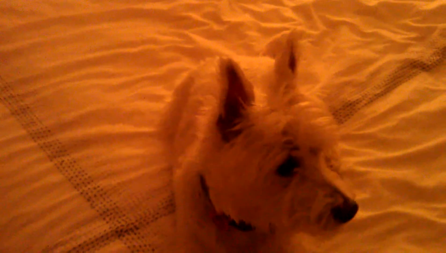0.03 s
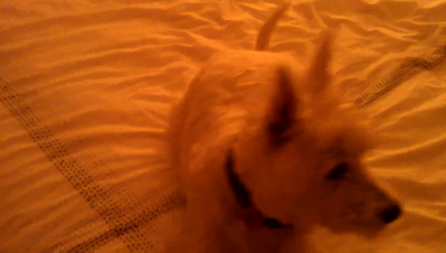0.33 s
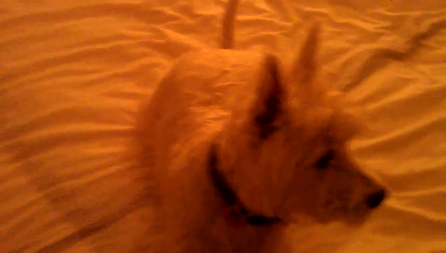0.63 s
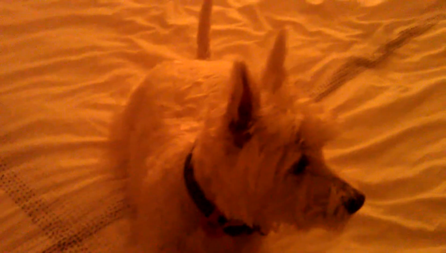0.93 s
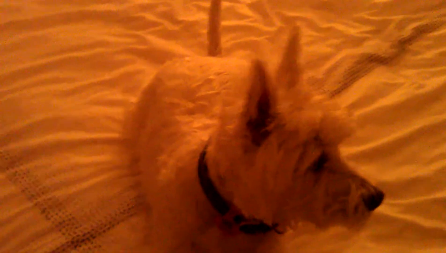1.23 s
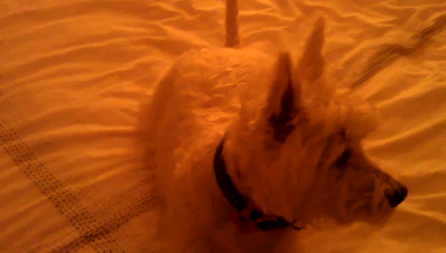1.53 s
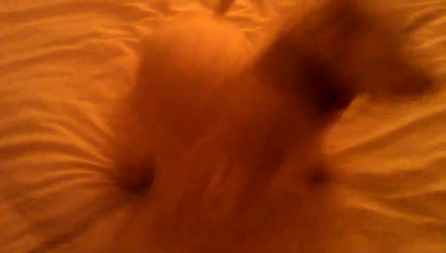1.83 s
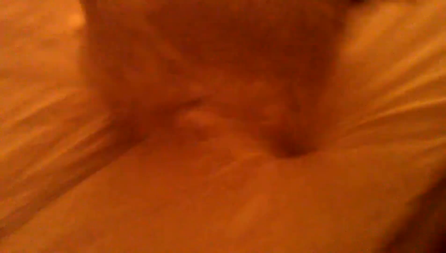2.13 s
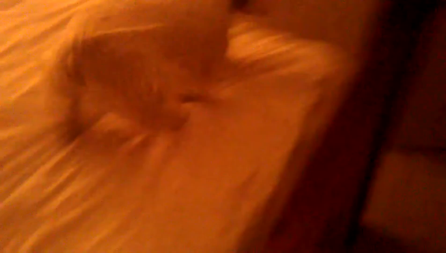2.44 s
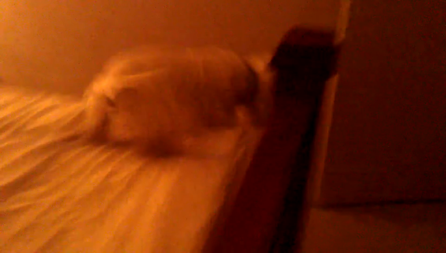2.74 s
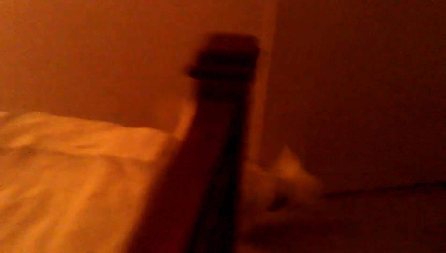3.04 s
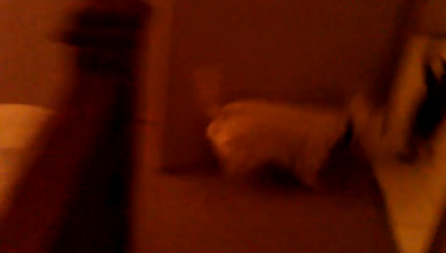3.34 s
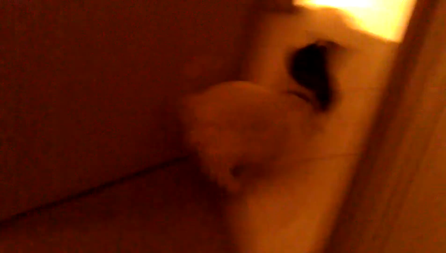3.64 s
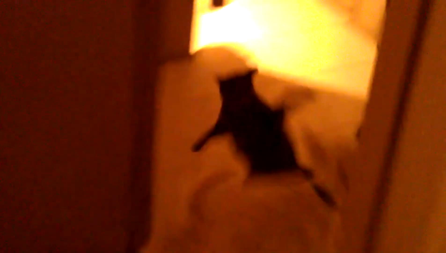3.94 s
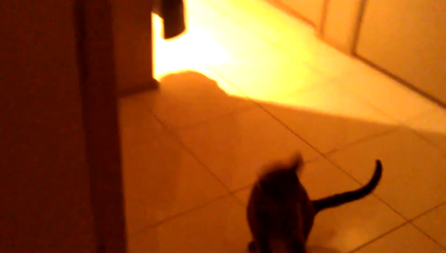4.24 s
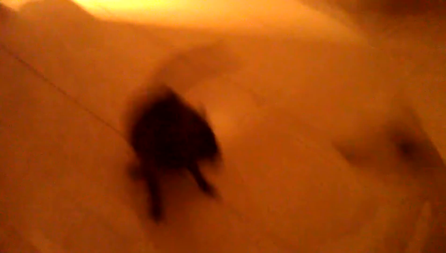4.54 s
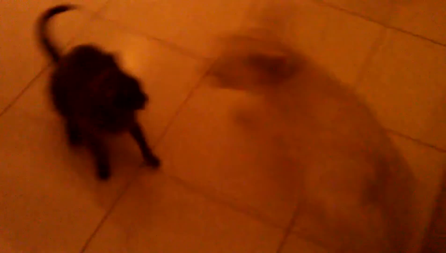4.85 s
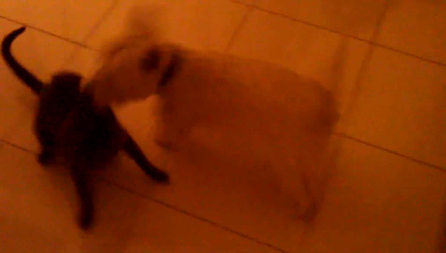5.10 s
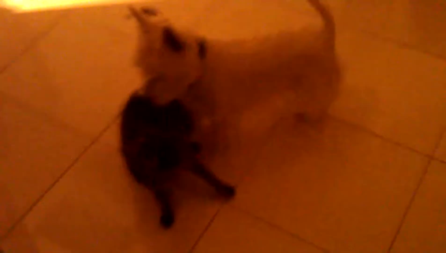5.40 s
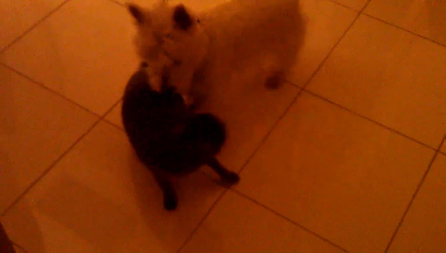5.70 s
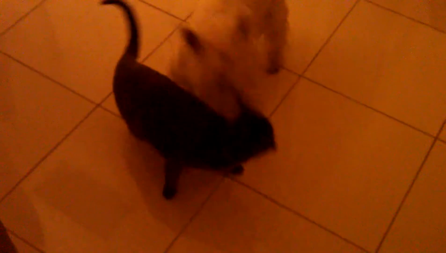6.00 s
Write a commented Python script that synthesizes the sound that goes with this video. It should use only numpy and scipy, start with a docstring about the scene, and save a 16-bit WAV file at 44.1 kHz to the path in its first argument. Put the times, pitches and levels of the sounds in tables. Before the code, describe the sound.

A faint steady hiss opens, with one slight brush of cloth at 0.2 seconds. At 1.7 seconds a small dog springs into motion close by: bedsheets rustle and rasp in quick strokes, paws thud softly on the mattress, and claws and collar click sharply. Around 2.4 seconds a hand knocks on the microphone three times. The dog lands on the floor with a thump at 3 seconds, then scuffs and scrabbles onto tiles. At about 3.7 seconds a cat gives a short, squeaky, falling squeal, followed just before 4 seconds by the sharpest click. Lighter scuffs, paw bumps and claw ticks continue until 5 seconds. At 5.4 seconds the cat gives a brief, slightly hoarse meow ending in a whine, then a faint whimper around 5.7. A few small ticks come near 6 seconds. Clicks and cries ring briefly in the small hard hallway.

```python
"""Dog and cat tussle

A small dog springs up on a bed, scrambles over the sheets, jumps down and tussles with a cat on tiles.
Rubbing cloth and fur rustle, paws thud and scuff, claws and collar click, and the cat's throat gives
a few short squeaky cries. The case of a hand-held camera knocks in the hand, over a faint hiss."""
import sys
import numpy as np
from scipy import signal
from scipy.fft import rfft, irfft, next_fast_len
from scipy.io import wavfile

SR = 44100
rng = np.random.default_rng(int(sys.argv[2]) if len(sys.argv) > 2 else 0)


def wav_out(sig):
    """Save sig, one row per channel (or a flat mono array), as 16-bit PCM at SR to the path in sys.argv[1]."""
    wavfile.write(sys.argv[1], SR, np.round(np.clip(np.atleast_2d(sig).T, -1, 1) * 32767).astype(np.int16))


N = 271788
T = np.arange(N) / SR
TOP_HZ = 13880  # the treble is cut off above this

# Sheets and fur rubbing between strokes, easing off after the bed: time_s, level_db
RUBBING = [(1.67, -54), (1.70, -41.5), (1.99, -45.5), (2.75, -45), (3.05, -45), (3.36, -49.5), (4.08, -46),
           (4.31, -56.5), (4.68, -46), (5.02, -56.5), (5.34, -63), (6.15, -57.5)]
# Single strokes of paws and fur over cloth or tile: peak_s, level_db, rise_s, treble_db
STROKES = [(0.21, -52.5, 0.023, 3), (1.749, -38, 0.011, 10), (1.811, -36.5, 0.024, 11),
           (1.875, -34.5, 0.075, -18), (2.064, -35.5, 0.0076, 0.5), (2.207, -35, 0.018, -1.5),
           (2.355, -30.5, 0.022, -9), (2.393, -34.5, 0.026, -2.5), (2.504, -37, 0.013, -2.5),
           (2.636, -36.5, 0.018, -11), (2.712, -37.5, 0.031, 0), (2.801, -40.5, 0.07, -6),
           (2.889, -35.5, 0.09, -0.5), (3.162, -33.5, 0.016, -1), (3.177, -40, .004, 8.5),
           (3.221, -37.5, 0.022, -2), (3.250, -42, .003, 8), (3.409, -39.5, 0.0093, -3),
           (3.478, -42, 0.012, 3.5), (3.511, -41.5, 0.0088, 5), (3.590, -46.5, 0.013, 6),
           (3.641, -45.5, 0.021, 5), (3.765, -46.5, 0.011, 8.5), (3.886, -39, 0.0051, -4),
           (3.990, -38.5, 0.042, 3.5), (4.105, -43.5, 0.0089, 4), (4.16, -48, 0.012, 8.5),
           (4.300, -57.5, 0.041, 18), (4.380, -45.5, 0.0029, 1), (4.419, -42.5, 0.026, 6),
           (4.475, -52, 0.023, 8), (4.574, -60, 0.014, 19.5), (4.664, -56, .007, 10),
           (4.726, -49, 0.01, 10.5), (4.938, -39.5, 0.017, 5.5), (5.092, -55, 0.024, 16.5),
           (5.150, -51.5, 0.022, 7), (5.211, -46.5, 0.0049, 0), (5.252, -62.5, 0.0096, 18),
           (5.43, -51.5, 0.0075, 21), (5.628, -64.5, 0.019, 22), (5.987, -67, .008, 22)]
# Tone of rubbed cloth: frequency_hz, gain_db
CLOTH_TONE = [(100, 7), (170, 5), (260, 9), (500, -1.5), (900, 4), (1500, 1.5), (2200, 2), (3000, -1.5),
              (4200, 1.5), (6500, -9.5), (9000, -13.5)]
# Thinner tone of paw pads on tile: frequency_hz, gain_db
TILE_TONE = [(100, -13), (260, 6.5), (500, 0.5), (900, -0.5), (2200, -1), (3000, -2), (4200, 0),
             (6500, -9.5), (9000, -15)]
# Bright tone of hair and claws: frequency_hz, gain_db
FIZZ_TONE = [(2500, -46), (5000, -10.5), (8000, 2), (10500, 7), (14000, 0.5)]
def scrabbling():
    """Sliding surfaces catch and let go: cloth and pads rasp, hair and claws fizz."""
    doorway_s, leaving_bed_s = 3.1, (2.9, 3.32)
    rasp_power = undb(np.interp(T, *np.transpose(RUBBING), left=-120)) ** 2
    fizz_power = rasp_power * undb(np.where(T < doorway_s, 2, 3.5)) ** 2  # brighter over tile
    for peak_s, level_db, rise_s, treble_db in STROKES:
        decay_s = 0.045 + 0.1 * rise_s  # a slow stroke also lets go slowly
        power = (undb(level_db) * stroke(peak_s, rise_s, decay_s)) ** 2
        rasp_power += power
        fizz_power += power * undb(treble_db) ** 2
    catching = undb(0.44 * wander(110))
    on_tile = np.interp(T, leaving_bed_s, [0, 1])
    cloth = friction(CLOTH_TONE, grain_db=1.5, grains_per_s=1600)
    tile = friction(TILE_TONE, grain_db=1.5, grains_per_s=1600)
    surface = np.sqrt(1 - on_tile) * cloth + np.sqrt(on_tile) * tile
    rasp = np.sqrt(rasp_power) * surface * pan(2.3)
    fizz = np.sqrt(fizz_power) * friction(FIZZ_TONE, grain_db=1.0, grains_per_s=1400) * pan(5.2)
    ticking = on_tile * np.sqrt(fizz_power) * claw_patter(ticks_per_s=170, spread_db=3.5) * pan(2.6)
    return catching * (rasp + undb(-1.5) * fizz + undb(-7) * ticking)


def friction(tone, grain_db, grains_per_s):
    """Countless tiny slips of uneven strength blend into noise with the tone of the surface."""
    slips = stereo_noise() * undb(grain_db * wander(grains_per_s))
    return unit(colour(slips, tone))


def claw_patter(ticks_per_s, spread_db, decay_s=0.0005):
    """Claw tips on a hard floor make tiny, bright ticks of uneven size."""
    taps = (rng.random(N) < ticks_per_s / SR) * undb(spread_db * rng.standard_normal(N))
    envelope = signal.lfilter([1], [1, -np.exp(-1 / (decay_s * SR))], taps)
    return unit(colour(stereo_noise() * envelope, [(1000, -15), (3500, -10), (10000, 2)]))


# Claws drawn briefly over cloth or tile: peak_s, level_db, pitch_hz, width_octaves, rise_s
CLAW_SCRAPES = [(1.744, -37, 2030, 0.95, 0.014), (1.800, -27.5, 1950, 0.89, 0.011),
                (2.171, -43, 5500, 0.47, 0.0024), (2.243, -40.5, 3980, 0.54, 0.0026),
                (2.443, -41.5, 6200, .6, 0.0074), (2.768, -42, 5170, 0.25, 0.015),
                (3.028, -36, 1380, 0.85, 0.0039), (3.408, -45.5, 3860, 0.42, .004),
                (3.514, -41, 3440, 0.37, 0.004), (4.713, -38.5, 4300, 2.5, 0.003),
                (5.950, -55, 4830, 0.7, .006), (6.125, -51, 7100, 0.9, .006)]
def claw_scrapes(decay_s):
    """A claw ticks across threads or tile so fast that it makes a zip."""
    out = 0
    for peak_s, level_db, pitch_hz, width_octaves, rise_s in CLAW_SCRAPES:
        noise = rng.standard_normal(N) + 0.58 * rng.standard_normal((2, N))
        zip_noise = band_pass(noise, pitch_hz, width_octaves)
        out += undb(level_db) * stroke(peak_s, rise_s, decay_s) * unit(zip_noise)
    return out * pan(2.6)


# Soft landings of paws and body: peak_s, level_db, rise_s, pitch_hz
LANDINGS = [(1.757, -43.5, 0.005, 230), (1.888, -31, 0.011, 249), (2.069, -43.5, 0.013, 279),
            (2.131, -35.5, 0.0019, 567), (2.136, -32, 0.005, 176), (2.164, -40, 0.0034, 300),
            (2.208, -41.5, 0.0098, 190), (2.301, -31.5, 0.0085, 346), (2.351, -36, 0.011, 185),
            (2.504, -37.5, 0.016, 360), (2.621, -45, 0.0054, 340), (2.708, -47, 0.017, 278),
            (2.884, -46, 0.017, 223), (3.035, -25, 0.0067, 295), (3.069, -40, 0.0025, 295),
            (3.163, -30.5, 0.0072, 415), (3.302, -44.5, 0.002, 293), (3.410, -51, 0.0072, 420),
            (3.885, -40, 0.01, 665), (4.383, -41.5, 0.0063, 705), (4.525, -40, 0.0017, 334),
            (4.538, -39.5, 0.0022, 360), (4.936, -47.5, 0.0029, 755)]
# What they land on (mattress, bedroom floor, tiles past the door, tiles close by): start_s, decay_s
SURFACES = [(0, 0.026), (3, 0.027), (3.6, 0.097), (4.5, 0.028)]
# Low notes of the bedroom, each fading by 60 dB in its ring time: pitch_hz, ring_s, level_db
ROOM_NOTES = [(226, 0.25, -2.5), (292.4, 0.22, -8.5), (440, .18, -20), (576, 0.29, -19)]
def paw_thuds(resonance_q, lowest_hz):
    """Each landing swings the mattress or floor once and leaves it shuddering; the room hums on."""
    push = stereo_noise() * undb(1.2 * wander(150))
    thuds = hum = 0
    for peak_s, level_db, rise_s, pitch_hz in LANDINGS:
        _, decay_s = SURFACES[sum(peak_s > start_s for start_s, _ in SURFACES[1:])]
        shaking = resonate(push, pitch_hz, resonance_q)
        shaking = signal.lfilter(*signal.butter(2, 3.6 * pitch_hz, fs=SR), shaking)  # soft pads dull it
        contact = stroke(peak_s, rise_s, decay_s)
        shudder = unit(contact * shaking) * np.sqrt(np.mean(contact ** 2))
        swing = np.sqrt(2) * np.sin(2 * np.pi * pitch_hz * (T - peak_s))
        blow = stroke(peak_s, rise_s=0.0018, decay_s=0.0053) * swing
        thuds += undb(level_db) * (undb(-3) * blow + undb(-1) * shudder)
    for pitch_hz, ring_s, level_db in ROOM_NOTES:
        hum += undb(level_db + 4) * resonate(thuds, pitch_hz, q=np.pi * pitch_hz * ring_s / np.log(1000))
    bass_cut = signal.butter(3, lowest_hz, "high", fs=SR)
    return signal.lfilter(*bass_cut, thuds + hum) * pan(1.0)


# Sharp ticks of claws and collar: start_s, level_db, pitch_hz, width_octaves, left_minus_right_db
SHARP_TICKS = [(1.748, -14, 10600, 0.33, 5), (1.8115, -11, 10500, 0.9, 8), (2.015, -32, 10120, .7, 5),
               (2.0622, -25, 3200, 1.7, 6), (2.169, -23.5, 5430, 0.54, 7), (2.2991, -14.5, 1530, 0.77, -2),
               (2.3265, -24.5, 7000, 1.3, -6), (2.4197, -20, 2550, 1.1, -3), (2.440, -36, 5400, 0.65, -2),
               (3.0275, -25, 1470, 1.1, 8), (3.160, -22.5, 10800, 0.29, 10), (3.1653, -18, 10900, 1.5, 1),
               (3.175, -21, 10500, .7, 5), (3.2474, -21.5, 5000, 1.7, 1), (3.493, -30, 5300, .7, -2),
               (3.5007, -18, 5600, 2, 1), (3.638, -23.5, 9000, 1, 5), (3.9444, -4, 11400, 0.46, 10),
               (3.9453, -12, 3940, 0.96, 4), (3.955, -14, 8700, 0.51, -8), (4.802, -32, 8000, 1.4, 0),
               (4.825, -34, 10300, .6, 4), (4.9117, -24.5, 10600, 0.76, 6), (4.9213, -26, 10500, 0.66, 8),
               (5.375, -31.5, 11300, 0.59, 11), (5.9731, -26.5, 11500, 0.25, 9), (6.109, -26, 7560, 1.8, 3)]
def claw_and_collar_clicks(rise_s, hold_until_s, decay_s):
    """Hard things strike together, each giving a very short crackle around its own pitch."""
    out, t = np.zeros((2, N)), T[:SR // 100]
    envelope = np.minimum(t / rise_s, 1) * np.exp(-np.maximum(t - hold_until_s, 0) / decay_s)
    for start_s, level_db, pitch_hz, width_octaves, pan_db in SHARP_TICKS:
        noise = rng.standard_normal(4 * len(t)) + rng.standard_normal((2, 4 * len(t)))
        tick = band_pass(noise, pitch_hz, width_octaves)[:, -len(t):] * envelope
        tick /= 2 * np.sqrt(np.sum(tick ** 2, axis=1, keepdims=True) / np.sum(envelope ** 2))  # peak ~1
        start = int(start_s * SR)
        out[:, start:start + len(t)] += (undb(level_db) * pan(pan_db) * tick)[:, :N - start]
    return out


# Four cries: a falling squeal, a lower pitch breaking in under it, a meow ending in a whine, a whimper.
# Points along each cry: time_s, pitch_hz, level_db, roughness (0-1), mouth_hz
CRY_SHAPES = [
    [(3.70, 824, -62, 0.28, 800), (3.735, 836, -52.5, 0.12, 1400), (3.762, 754, -44, 0.14, 1710),
     (3.795, 752, -39, 0.17, 2250), (3.822, 757, -41, 0.15, 2290), (3.836, 752, -52, 0.3, 2300)],
    [(3.79, 734, -55, 0.4, 2100), (3.801, 683, -40, 0.25, 1800), (3.824, 638.5, -44, 0.18, 1600),
     (3.856, 650, -54, 0, 1350)],
    [(5.3735, 723, -60, 1, 1900), (5.3755, 714, -45, 0.9, 2000), (5.388, 696, -41.5, 0.54, 1730),
     (5.403, 699, -41, 0.2, 1480), (5.433, 731, -37, 0.1, 1840), (5.463, 738.4, -55, 0.13, 1950),
     (5.485, 720, -48.5, 0.2, 1150), (5.507, 799, -56, .4, 800), (5.55, 823, -54, 0.58, 1000),
     (5.58, 800, -68, .3, 900)],
    [(5.66, 779, -56, 0.44, 1500), (5.683, 762, -53, 0.24, 1480), (5.715, 755, -55.5, 0.36, 1900),
     (5.765, 764, -58, 0.85, 1150), (5.805, 788, -62.5, 0.8, 1000), (5.84, 820, -66, .6, 900)],
]
# How hard each cry is pushed out, which keeps its overtones strong: effort (0-1)
CRY_EFFORTS = [0.056, 0.12, 0.33, .08]
def cat_cries():
    """The cat squeals, meows and whimpers, pushing each cry out with a different effort."""
    return sum(cat_voice(shape, effort) for shape, effort in zip(CRY_SHAPES, CRY_EFFORTS)) * pan(3.2)


# Where the cat's throat rings: pitch_hz, width_hz, gain_db
THROAT_RINGS = [(810, 79, 0), (1400, 200, 1.5), (2060, 320, 5.5), (2700, 210, 3.5), (3730, 300, 8),
                (4380, 270, 0.5)]
def cat_voice(shape, effort, wobble=0.046, flutter_hz=268.6, rasp_db=4.0, mouth_width_hz=770):
    """Vocal folds make the throat and mouth ring; rough stretches wobble, flutter and turn hoarse."""
    times, *columns = np.transpose(shape)
    on = (T > times[0]) & (T < times[-1])
    pitch_hz, level_db, roughness, mouth_hz = (np.interp(T[on], times, column) for column in columns)
    pitch_hz *= 1 + wobble * roughness * wander(450)[on]
    phase = 2 * np.pi * np.cumsum(pitch_hz) / SR
    harmonics = np.arange(1, 8)[:, None]
    harmonic_hz = harmonics * pitch_hz
    throat_power = sum(undb(db) ** 2 * hump(harmonic_hz, hz, width) for hz, width, db in THROAT_RINGS)
    gains = np.sqrt(throat_power) * (hump(harmonic_hz, mouth_hz, mouth_width_hz) + effort)
    voice = np.sum(gains * np.sin(harmonics * phase), axis=0) / np.sqrt(np.sum(gains ** 2, axis=0) / 2)
    voice *= 1 + 0.68 * roughness * np.sin(2 * np.pi * flutter_hz * T[on])  # a strained voice flutters
    puffs = rng.standard_normal(N)[on] * (1 + np.cos(phase))  # air hisses through once a cycle
    breath = sum(undb(db) * resonate(puffs, hz, hz / width) for hz, width, db in THROAT_RINGS[1:])
    breath = unit(signal.sosfilt(signal.butter(6, 4500, fs=SR, output="sos"), breath))
    loudness = undb(level_db + rasp_db * roughness * wander(260)[on])
    out = np.zeros(N)
    out[on] = (voice + 1.03 * roughness * breath) * loudness
    return out


# Knocks of the hand on the camera case: start_s, level_db, pitch_hz, decay_s
HAND_KNOCKS = [(2.3205, -19, 770, 0.0011), (2.3671, -8, 680, 0.00077), (2.4208, -20.5, 780, 0.0008),
               (3.771, -29.5, 704, 0.0011), (4.268, -29.5, 790, 0.00083)]
def case_knocks(left_share, thump_hz, thump_db):
    """The case rocks, pushing its two microphone openings opposite ways; its body thumps in both."""
    rock, thump = np.zeros((2, N))
    for start_s, level_db, pitch_hz, decay_s in HAND_KNOCKS:
        t = np.clip(T - start_s, 0, decay_s * 20)
        envelope = undb(level_db) * t / decay_s * np.exp(1 - t / decay_s)
        rock += envelope * np.sin(2 * np.pi * pitch_hz * t)
        thump += envelope * np.sin(2 * np.pi * thump_hz * t)
    return np.array([-left_share * rock, rock]) + undb(thump_db) * thump


def near_echo(sound, gain, delay_s, sway, turns_per_s):
    """Sound bounces off a nearby surface; its path shifts as the animals and the camera move."""
    echo = [np.interp(T - delay_s * (1 + sway * wander(turns_per_s)), T, side) for side in sound]
    return (sound + gain * np.array(echo)) / np.sqrt(1 + gain ** 2)


def hallway_ring(sound, low_ring_s, high_ring_s):
    """Echoes off hard walls blur into a tail; lows and highs each fade by 60 dB in their ring time."""
    t = T[:SR // 2]
    noise = rng.standard_normal((2, len(t)))
    lows = signal.sosfilt(signal.butter(2, 3000, fs=SR, output="sos"), noise)
    tail = lows * undb(-60 * t / low_ring_s) + (noise - lows) * undb(-60 * t / high_ring_s)
    tail *= t > .003  # a gap before the first echo
    return signal.fftconvolve(sound, tail / np.sqrt(np.sum(tail ** 2) / 2), axes=-1)[:, :N]


# Tone of the room's murmur and the microphone's hiss: frequency_hz, gain_db
HISS_TONE = [(30, -27), (86, -23), (164, -5), (217, 0.5), (310, -1), (400, -1.5), (600, -3), (780, 1),
             (1100, -5.5), (2000, -4.5), (4300, -5.5), (7700, -15.5), (9500, -7.5), (14000, -10.5)]
# The camera's electrical whine: pitch_hz, level_db
WHINE_NOTES = [(6289, -73.5), (12685, -77)]
def background(hiss_db):
    """The room murmurs, the microphone hisses and the camera's electronics whine faintly."""
    shared, difference = rng.standard_normal((2, N))
    difference *= undb(-2)
    hiss = colour(np.array([shared + difference, shared - difference]), HISS_TONE)
    out = hiss / np.std(hiss.mean(axis=0)) * undb(hiss_db)
    for pitch_hz, level_db in WHINE_NOTES:
        phase = 2 * np.pi * np.cumsum(pitch_hz + 9 * wander(40)) / SR
        out += undb(level_db) * np.sqrt(2) * np.sin(phase)
    return out * pan(1.34)


# How much left and right differ, against what they share: frequency_hz, difference_db
STEREO_WIDTH = [(100, -2), (200, -28), (370, -1.5), (650, 7), (1300, -2), (3000, -4), (10000, -1)]
def stereo_noise():
    """White noise from all around reaches left and right a little differently."""
    shared, difference = rng.standard_normal((2, N))
    difference = colour(difference, STEREO_WIDTH)
    flatten = [(hz, -10 * np.log10(1 + undb(db) ** 2)) for hz, db in STEREO_WIDTH]
    return colour(np.array([shared + difference, shared - difference]), flatten)


def stroke(peak_s, rise_s, decay_s):
    """Loudness of one contact: pressure builds, then dies away."""
    t = T - peak_s
    return np.exp(-np.minimum(np.where(t < 0, (t / rise_s) ** 2 / 2, t / decay_s), 20))


def wander(turns_per_s):
    """A random drift that strays about 1 either side of zero."""
    return 1.37 * np.interp(T * turns_per_s, np.arange(N), rng.standard_normal(N))


def colour(sound, tone):
    """Shape bass and treble along a list of (frequency_hz, gain_db) points."""
    size = next_fast_len(N + SR // 2, real=True)
    hz, db = np.transpose(tone)
    log_gain = np.log(undb(np.interp(np.log(np.fft.rfftfreq(size, 1 / SR) + 1), np.log(hz), db)))
    log_response = irfft(log_gain, size)
    log_response[1:size // 2] *= 2  # fold it so the filter rings only after a sound, never before
    log_response[size // 2 + 1:] = 0
    return irfft(rfft(sound, size) * np.exp(rfft(log_response)), size)[..., :N]


def band_pass(sound, pitch_hz, width_octaves):
    """Keep only a band around one pitch."""
    ratio = 2 ** (width_octaves / 2)
    edges_hz = [pitch_hz / ratio, min(pitch_hz * ratio, TOP_HZ)]
    return signal.sosfilt(signal.butter(2, edges_hz, "band", fs=SR, output="sos"), sound)


def resonate(sound, pitch_hz, q):
    """Ring at one pitch; a higher q rings longer."""
    return signal.lfilter(*signal.iirpeak(pitch_hz, q, fs=SR), sound)


def hump(hz, centre_hz, width_hz):
    """Strength of a resonance: 1 at its centre, less to either side."""
    return 1 / (1 + (2 * (hz - centre_hz) / width_hz) ** 2)


def undb(db):
    """Turn decibels into a gain."""
    return 10 ** (np.asarray(db) / 20)


def unit(sound):
    """Scale to an average power of 1."""
    return sound / np.sqrt(np.mean(sound ** 2))


def pan(db):
    """Gains that make the left side `db` louder than the right."""
    return undb(np.array([[db], [-db]]) / 2)


def scene():
    """The animals close by, with the hard little hallway ringing after clicks and cries."""
    clicks = claw_and_collar_clicks(rise_s=0.0003, hold_until_s=0.0006, decay_s=0.0011)
    cat = cat_cries()
    ticks = clicks + undb(-2) * hallway_ring(clicks, low_ring_s=0.14, high_ring_s=0.2)
    cries = undb(-1) * cat + hallway_ring(cat, low_ring_s=0.35, high_ring_s=0.19)
    knocks = case_knocks(left_share=0.1, thump_hz=434, thump_db=-14)
    thuds = paw_thuds(resonance_q=1.5, lowest_hz=130)
    rustle = scrabbling() + claw_scrapes(decay_s=0.022)
    rustle = near_echo(rustle, gain=0.42, delay_s=0.0022, sway=0.123, turns_per_s=3)
    return rustle + thuds + ticks + cries + knocks


# How strongly the microphone picks up each pitch: frequency_hz, gain_db
MICROPHONE_TONE = [(30, -41), (90, -31.5), (155, -2), (4500, 0.5), (6000, -1), (6900, -4), (7600, -8.5),
                   (8300, -5), (9000, -0.5), (10500, 0.5), (12300, -2), (14000, -9)]
def record(dry):
    """A small microphone: little bass, a dip near 7.6 kHz, a bright peak above and a steep top cut."""
    sound = colour(dry, MICROPHONE_TONE) + background(hiss_db=-52.5)
    return signal.sosfilt(signal.ellip(10, .2, 75, TOP_HZ, fs=SR, output="sos"), sound)


dry = scene()
out = record(dry)
wav_out(out)
```